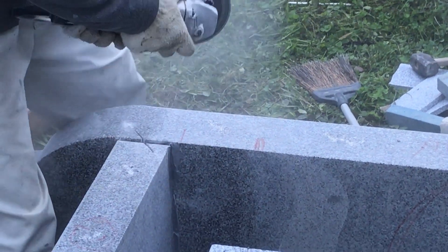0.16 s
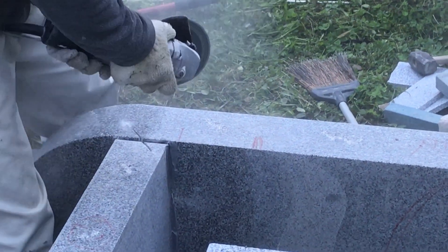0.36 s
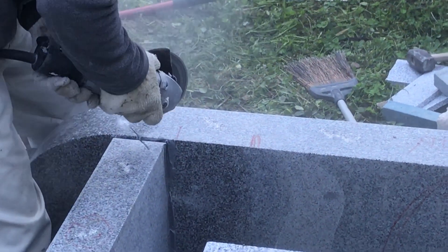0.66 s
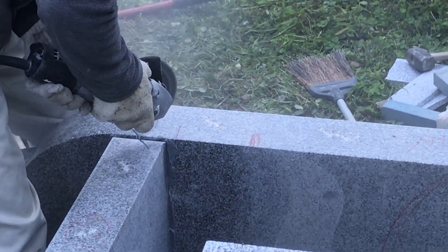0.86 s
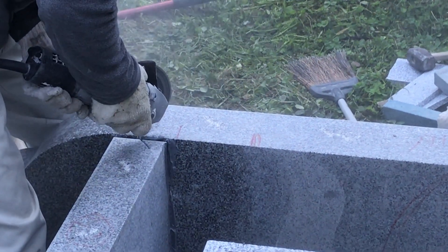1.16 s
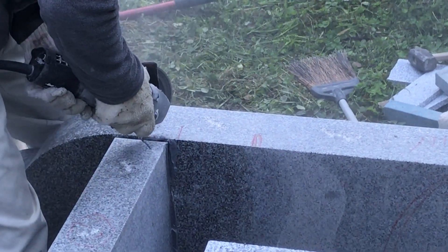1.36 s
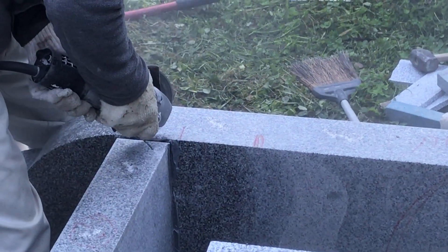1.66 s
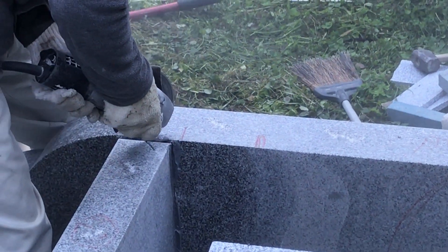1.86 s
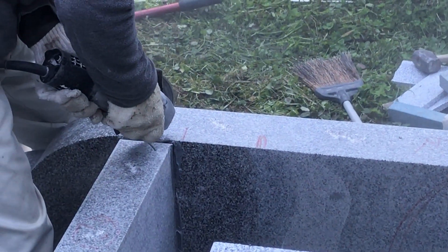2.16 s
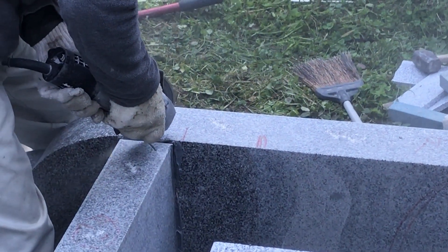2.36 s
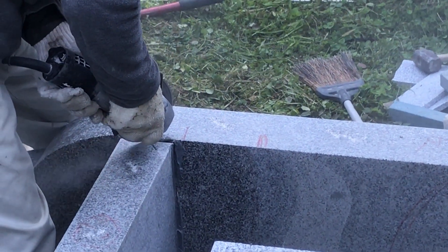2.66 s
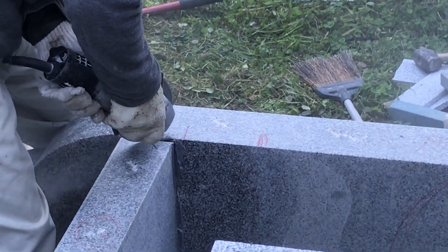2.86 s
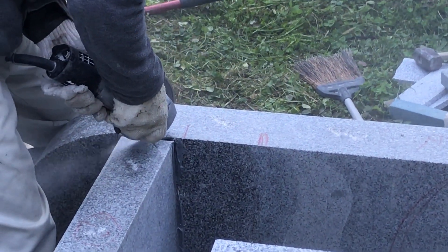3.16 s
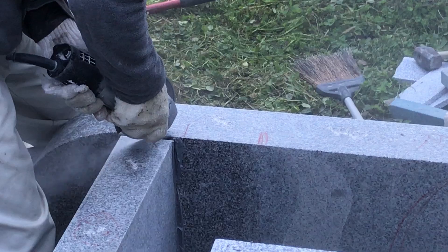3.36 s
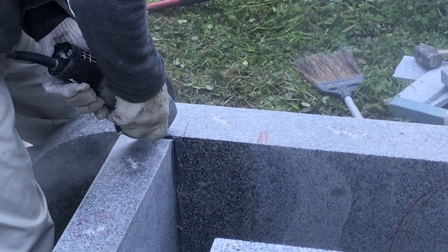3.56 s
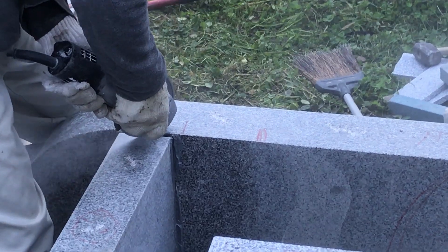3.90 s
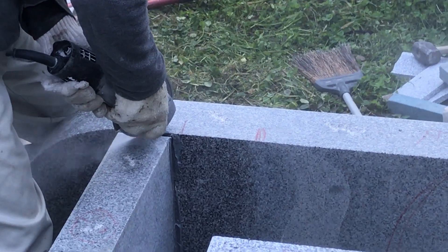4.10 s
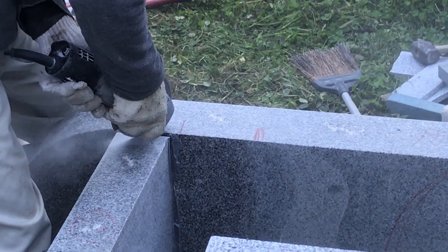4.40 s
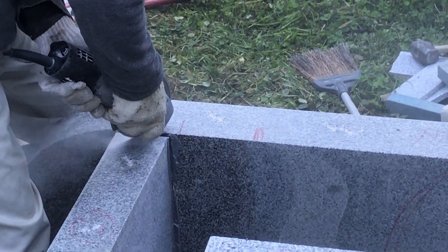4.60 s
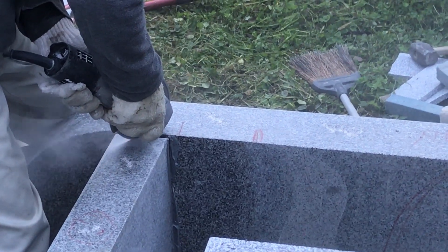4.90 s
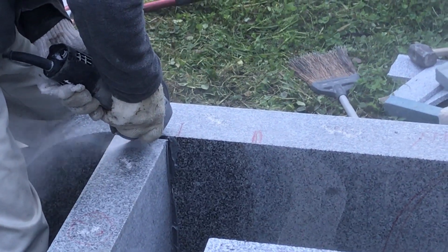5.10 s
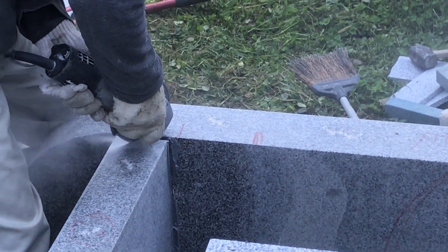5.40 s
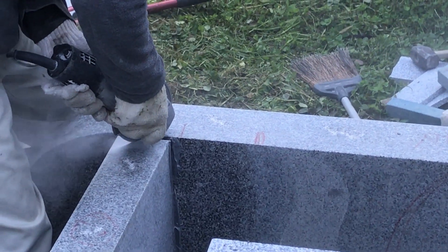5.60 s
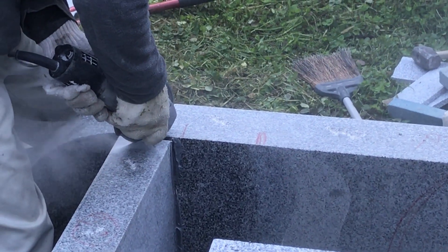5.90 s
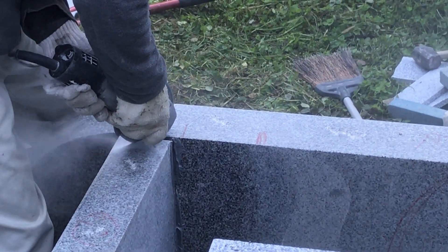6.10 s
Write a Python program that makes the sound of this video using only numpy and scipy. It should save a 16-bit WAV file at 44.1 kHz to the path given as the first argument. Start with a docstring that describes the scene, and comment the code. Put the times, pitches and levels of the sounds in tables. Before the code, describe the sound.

An angle grinder spins up with rushing air and rising whine, then bites into granite with a harsh, squealing, knocking grind outdoors.

```python
"""An angle grinder spins up in the open air: air rushes, tones climb and loose gears rattle in short spells.
Then its diamond wheel is pushed into a granite kerb: noise shaped by resonances grinds and knocks in the cut.
The motor slows under the load, and its fan, hum and whine follow; steady tones sing out as wheel squeals.
Further off, a generator drones as a stack of steady tones over low outdoor noise.
The recorder's gain control turns the loud cut down, so the fan and generator sink with it."""
import sys
import numpy as np
from scipy import signal
from scipy.fft import rfft, irfft, next_fast_len
from scipy.io import wavfile
from scipy.ndimage import uniform_filter1d

SR = 44100
rng = np.random.default_rng(int(sys.argv[2]) if len(sys.argv) > 2 else 0)


def transcribe(u):
    """Save the signal u as a 16-bit wav file named by the first command-line argument.

    u: samples, shape (n,) or (channels, n), limited to [-1, 1]; the rate is SR.
    q: integer samples, one column per channel.
    """
    v = np.clip(np.atleast_2d(u).T, -1, 1)
    q = np.round(v * 32767).astype(np.int16)
    wavfile.write(sys.argv[1], SR, q)


N = 275625
TIME = np.arange(N) / SR  # seconds

# All levels below are those before the stone echoes and the gain control.

# Colour of the rushing cooling air: pitch_hz, level_db (relative, per Hz)
FAN_COLOUR = [(200, -31), (385, -8), (590, -13), (740, -5), (1120, -4.5), (1900, -8), (2600, -4),
              (4200, -4.5), (4950, -7), (5500, -2), (7200, -6), (7800, -9.5), (9600, -7.5), (10400, -13),
              (11400, -8.5), (13500, -11), (15500, -15.5)]
# Air passages of the housing: pitch_hz, width_hz, level_db (over the rush)
HOUSING_MODES = [(2293, 135, 1.5), (2840, 170, 3.5), (3540, 360, 1.5), (6100, 250, 3.5), (8060, 300, 0)]
# Vents turning as the tool is lowered: time_s, hiss_hz, hiss_db (against the rush), low_rush_db
VENT_CURVES = [(0, 4720, -9, -4), (.1, 4710, -3.5, -2.5), (.25, 5450, -8, -1), (.56, 5600, -11.5, 1.5),
               (.68, 3800, -4.5, 0.5), (1, 3550, -24, 2), (1.35, 6200, -12, 2.5), (6.25, 6200, -20, -1)]
# Fan and armature tones: multiple of the shaft speed, level_db (against the rush)
WHINE_TONES = [(2, -24), (3, -26), (4, -24), (5, -37), (9, -25), (10, -30), (12, -14), (24, -12)]
# Spells in which the unloaded gears rattle: start_s, end_s, peak_db
RATTLE_SPELLS = [(0.362, 0.58, -22.5), (0.911, 1.025, -22.5), (1.3, 1.718, -21)]
# Braking of the wheel by the stone: time_s, share of the speed lost (0-1)
DRAG_CURVE = [(2.1, 0), (2.3, .006), (2.6, .03), (3.2, .112), (3.8, .212), (4.4, .28), (5, .324),
              (6.25, .368)]

# Sinking of the wheel into the stone: time_s, depth (0-1)
DEPTH_CURVE = [(2.1, 0), (2.9, 0.26), (3.3, 0.45), (3.7, 0.71), (4.3, 0.94), (6.25, 0.95)]
# Pressure on the wheel: time_s, grind_db, bounce_db, low_ring_db (change of the low stone ring)
PRESSURE_CURVES = [(2.11, -25.5, -29.5, -15), (2.44, -26, -14.5, 2), (2.56, -17.5, -13, 5.5),
                   (2.85, -17, -11, 3), (3.15, -15, -7.5, 1.5), (3.38, -16, -8, -1), (3.58, -11, -9.5, 0),
                   (4.6, -11.5, -7, -2.5), (6.25, -10, -7, -6)]
# Hard knocks of the wheel in the cut: time_s, level_db (over an ordinary hop)
HARD_KNOCKS = [(2.197, 5.5), (2.334, 1), (2.441, 1.5), (2.631, 0), (2.737, 3), (2.772, 4), (2.847, 2),
               (2.967, 1), (3.073, 2), (3.133, 3.5), (3.26, 0), (3.314, 1.5), (3.343, 2), (3.396, 0),
               (3.426, 3), (3.618, -1), (3.766, 3.5), (3.927, 4.5), (4.186, 4.5), (4.495, 2), (4.616, 3),
               (4.827, 2), (5.254, 2.5), (5.621, 1.5), (5.83, 1.5), (6.11, 3)]
# Ringing of wheel, guard and stone: pitch_hz, width_hz, shallow_db, deep_db (over the broad noise)
CUT_MODES = [(1108, 39, 13, 2), (1327, 91, 8.5, 6), (1663, 54, -4, 2), (2390, 390, 0, 4.5),
             (2900, 58, -8, 10.5), (3180, 57, 15, 11.5), (3590, 32, 10, 13.5), (3877, 216, 14, 10.5),
             (3987, 123, 16, 16), (4254, 63, 24.5, 15.5), (4535, 91, 17.5, 15), (4700, 34, 20.5, 12),
             (5360, 50, 14.5, 13), (5852, 115, 19.5, 17), (5980, 132, 17, 16), (7300, 160, 8.5, 10.5),
             (8084, 62, 11.5, 12), (8345, 47, 18, 15), (8650, 17, 11, -4), (8765, 28, -10, 19.5),
             (9340, 62, 10, 11), (9880, 117, 9, 1), (10150, 100, -4, 1.5), (10080, 22, 16.5, -1),
             (10900, 180, 5.5, 4), (11740, 190, -3, 8.5), (12030, 134, 18, 11), (13270, 115, 0.4, 13.5),
             (13684, 60, 7, -6.0), (13900, 160, 15, 8)]
# Colour of crushed grains: pitch_hz, level_db (relative, per Hz)
GRIT_COLOUR = [(200, -24), (500, -22), (700, -15), (1200, -4), (2000, -4.5), (3000, -3), (4300, -1),
               (5100, -3.5), (7000, -2), (9000, 0), (12500, 0), (14300, -4.5), (15600, -0.5)]
# Extra colour of the steady grinding: pitch_hz, level_db
GRIND_COLOUR = [(700, 4.5), (1500, -1), (4000, 0), (6000, -3), (8000, 3.5), (15000, 2.5)]
# Extra colour of the knocks: pitch_hz, level_db
KNOCK_COLOUR = [(700, -13), (1500, 6), (4000, 2), (6000, 2), (8000, -2), (15000, -1.5)]
# Wheel tones that friction sets singing: start_s, end_s, pitch_hz, level_db
SQUEAL_TONES = [(2.1, 2.7, 8549, -26), (2.1, 2.6, 14200, -36), (2.1, 2.55, 14800, -40),
                (2.1, 2.35, 13200, -38), (2.12, 2.7, 3876, -32), (2.45, 3.6, 13690, -33),
                (2.5, 3.4, 8136, -30), (2.9, 3.7, 3209, -31), (3.3, 3.85, 10056, -27),
                (3.3, 5.0, 8294, -28), (3.5, 5.0, 8723, -25), (4.05, 4.55, 8700, -18),
                (4.4, 5.4, 9190, -28), (4.6, 6.25, 13410, -28)]

# Generator engine speed: time_s, firings_per_s
FIRING_CURVE = [(0, 31.0), (.8, 30.9), (1.2, 31.45), (2.0, 31.55), (6.25, 31.1)]
# Generator exhaust tones: multiple of the firing rate, level_db (over the drone level)
EXHAUST_TONES = [(2, -3), (3, -16.5), (4, -17), (5, -8.5), (6, -4), (7, -18.5), (8, -13.5), (9, -18.5)]
# Colour of the outdoor noise: pitch_hz, level_db (relative, per Hz)
YARD_COLOUR = [(25, -30), (60, -9), (120, -1), (250, 2.5), (500, -6), (1000, -24), (4000, -20)]
# Reflections off the kerb stones and the ground: delay_s, gain
STONE_ECHOES = [(.00339, .2), (.0022, .1), (.00381, .09), (.00868, .12), (.0134, .12), (.0197, .1),
                (.0283, .09)]

# The motor nears its free speed (turns per s) with this time constant (s); shaft turns per wheel turn
START_SPEED, FREE_SPEED, SPIN_UP_S = 456, 602.5, 1.0
GEAR_RATIO = 3.56
# Air and hum: level at free speed, and the power of the speed with which each grows
RUSH_DB, RUSH_POWER = -25, 0.83
HUM_DB, HUM_POWER = -42, 4.8
RATTLES_PER_S, RATTLE_SPREAD_DB = 27, 0.5
# The wheel meets the stone
TOUCH_S, TOUCH_RISE_S = 2.1, 0.018
# Hop rate in a shallow and a deep cut, and the power of depth between them
SHALLOW_HOPS_PER_S, DEEP_HOPS_PER_S, GRIP_POWER = 35.5, 56, 3.0
HOP_JITTER_S, HOP_SPREAD_DB = 0.0023, 1.57
LIFT_OFF = 0.04  # how strongly grinding thins out between hops (0-1)
DRONE_DB, YARD_DB = -36.5, -45.5
# Recorder: level its gain control holds, how fast the gain falls and creeps back (dB per s), and the end of its
# treble
HOLD_DB, TURN_DOWN_DB_PER_S, RECOVER_DB_PER_S = -17, 6.5, 6
CUTOFF_HZ = 15750


def shaft_speed():
    """The motor runs up freely, then slows under the load: turns per s."""
    unloaded = FREE_SPEED - (FREE_SPEED - START_SPEED) * np.exp(-TIME / SPIN_UP_S)
    return unloaded * (1 - in_time(DRAG_CURVE)[0])


def motor(speed):
    """Cooling air, shaft hum and whine grow with the speed; unloaded gears rattle in spells."""
    speed_db = 20 * np.log10(speed / FREE_SPEED)
    fan_db = RUSH_DB + RUSH_POWER * speed_db
    shaft = turns_of(speed * (1 + 0.00054 * drift(26)))
    # the air pulses with each turn of the shaft and of the wheel
    pulse_db = 1.1 * np.sin(shaft) + 0.79 * np.sin(shaft / GEAR_RATIO)
    flow = from_db(fan_db + 0.86 * drift(60) + pulse_db)
    hum_db = HUM_DB + HUM_POWER * speed_db + 0.36 * drift(5)
    hum = from_db(hum_db) * np.sqrt(2) * np.sin(shaft)
    whine = np.zeros(N)
    for multiple, db in WHINE_TONES:
        whine += from_db(fan_db + db + 3.4 * drift(25)) * np.sin(multiple * shaft)
    return air(flow) + hum + whine + gear_rattle()


def gear_rattle():
    """Loose gear teeth clack together: short noise bursts ring in two broad resonances."""
    clacks = []
    for start, end, db in RATTLE_SPELLS:
        for s in evenly(start, end, RATTLES_PER_S):
            clacks.append((s, db + RATTLE_SPREAD_DB * rng.standard_normal()))
    backlash = blows(clacks, rise_s=0.00072, decay_s=0.0029)
    gears = resonate(backlash * rng.standard_normal(N), 6240, 900)
    gears = resonate(gears, 5800, 1300)
    return gears * rms(backlash) / rms(gears)


def air(flow, hiss_width_hz=750):
    """Air rushes through the housing, with a hiss whose pitch shifts as the vents turn."""
    hiss_hz, hiss_db, low_db = in_time(VENT_CURVES)
    modes = [(hz, width_hz, from_db(db)) for hz, width_hz, db in HOUSING_MODES]
    rush = rubbed(flow, modes, FAN_COLOUR)
    low_change = (from_db(low_db) - 1) * band(rush, 590, 1600)
    # two slow noises, moved up to the hiss pitch
    lowpass = signal.butter(2, hiss_width_hz, fs=SR, output="sos")
    eddies = signal.sosfilt(lowpass, rng.standard_normal((2, N)))
    angle = turns_of(hiss_hz)
    hiss = eddies[0] * np.cos(angle) + eddies[1] * np.sin(angle)
    return rush + low_change + flow * from_db(hiss_db) * hiss / rms(hiss)


def cut(speed):
    """Diamond grit crushes the stone, harder once a turn of the wheel and at every bounce."""
    depth = in_time(DEPTH_CURVE)[0]
    grind_db, bounce_db, low_ring_db = in_time(PRESSURE_CURVES)
    # the walls of the cut damp some modes and drive others
    modes = []
    for hz, width_hz, shallow_db, deep_db in CUT_MODES:
        gain = from_db(shallow_db) * (1 - depth) + from_db(deep_db) * depth
        modes.append((hz, width_hz, gain))
    wheel = turns_of(speed / GEAR_RATIO)
    grains = from_db(1.68 * drift(710))
    hopping = blows(bounces(depth, bounce_db), rise_s=0.0015, decay_s=0.0049)

    # between bounces the wheel lifts a little, so the grinding thins out
    bounce = hopping + .02
    pressed = (bounce / uniform_filter1d(bounce, SR // 10)) ** LIFT_OFF
    touching = np.clip((TIME - TOUCH_S) / TOUCH_RISE_S, 0, 1)
    push = from_db(grind_db + 2 * np.sin(wheel) + 1.1 * drift(27))
    grinding = rubbed(touching * push * grains * pressed, modes, GRIT_COLOUR, GRIND_COLOUR)

    knock_force = hopping * grains * from_db(0.7 * np.sin(wheel))
    knocks = rubbed(knock_force, modes, GRIT_COLOUR, KNOCK_COLOUR)
    low_ring_change = (from_db(low_ring_db) - 1) * band(knocks, 1240, 1650)
    return grinding + knocks + low_ring_change


def bounces(depth, bounce_db):
    """Each hard knock sets the wheel hopping until the next, faster in a deep cut: rows of time_s, level_db."""
    per_s = SHALLOW_HOPS_PER_S + (DEEP_HOPS_PER_S - SHALLOW_HOPS_PER_S) * depth ** GRIP_POWER
    starts = [s for s, _ in HARD_KNOCKS]
    ends = starts[1:] + [TIME[-1]]
    hops = []
    for start, end in zip(starts, ends):
        rate = np.interp((start + end) / 2, TIME, per_s)
        hops.append(evenly(start, end, rate)[1:-1])  # the ends are the knocks themselves
    hops = np.concatenate(hops)
    hop_s = hops + HOP_JITTER_S * rng.standard_normal(len(hops))
    hop_db = HOP_SPREAD_DB * rng.standard_normal(len(hops))
    s, db = np.vstack([HARD_KNOCKS, np.column_stack([hop_s, hop_db])]).T
    return np.column_stack([s, db + np.interp(s, TIME, bounce_db)])


def squeals(fade_in_s=0.093, fade_out_s=0.072, waver_hz=11):
    """Friction makes wheel modes sing in turn or together, each fluttering in level and pitch."""
    out = np.zeros(N)
    for start, end, hz, db in SQUEAL_TONES:
        fade_in = (TIME - start) / fade_in_s
        fade_out = (end - TIME) / fade_out_s
        swell = np.clip(np.minimum(fade_in, fade_out), 0, 1)
        tone = np.sin(turns_of(hz + waver_hz * drift(89)))
        out += swell * from_db(db + 4.9 * drift(23)) * tone
    return out


def thrum(speed):
    """Deep in the cut the wheel pushes on the stone once a turn: a low, unsteady note."""
    depth = in_time(DEPTH_CURVE)[0]
    wheel = turns_of(speed / GEAR_RATIO) + 0.88 * drift(15)
    return depth * from_db(-45.0 + 2 * drift(8)) * np.sin(wheel)


def generator():
    """Regular engine firings make a drone: exhaust tones at multiples of the firing rate."""
    cycle = turns_of(in_time(FIRING_CURVE)[0])
    drone = np.zeros(N)
    for multiple, db in EXHAUST_TONES:
        phase = rng.uniform(0, 2 * np.pi)
        drone += from_db(db + 0.66 * drift(3.6)) * np.sin(multiple * cycle + phase)
    return from_db(DRONE_DB) * np.sqrt(2) * drone


def yard():
    """Low outdoor noise: random noise with a dark colour."""
    bed = coloured(rng.standard_normal(N), YARD_COLOUR)
    return from_db(YARD_DB) * bed / rms(bed)


def among_stones(x):
    """Hard faces close by send back quick copies, which ripple the colour."""
    out = x.copy()
    for delay_s, gain in STONE_ECHOES:
        out += gain * np.interp(TIME - delay_s, TIME, x, left=0)
    return out


def gain_control(x):
    """While the sound is too loud the gain slides down; otherwise it creeps back up, at most to 0 dB."""
    step = SR // 100
    power = np.abs(uniform_filter1d(x[0] ** 2, SR // 10))[::step]
    level_db = 10 * np.log10(power + 1e-12)
    gain_db = [0.]
    for db in level_db[1:]:
        wanted = min(HOLD_DB - db, 0)
        lowest = gain_db[-1] - TURN_DOWN_DB_PER_S * step / SR
        highest = gain_db[-1] + RECOVER_DB_PER_S * step / SR
        gain_db.append(np.clip(wanted, lowest, highest))
    return x * from_db(np.interp(TIME, TIME[::step], gain_db))


def rubbed(force, modes, *colours):
    """A fluctuating force drives broad noise and every mode; the result is as strong as the force."""
    out = force * rng.standard_normal(N)
    for hz, width_hz, gain in modes:
        out = out + resonate(gain * force * rng.standard_normal(N), hz, width_hz)
    for colour in colours:
        out = coloured(out, colour)
    return out * rms(force) / rms(out)


def blows(events, rise_s, decay_s):
    """Force of short contacts: each swells smoothly and dies away."""
    s, db = np.transpose(events)
    places = np.clip(s * SR, 0, N - 1).astype(int)
    clicks = np.bincount(places, from_db(db), N)
    t = TIME[:SR // 10]
    shape = (1 - np.exp(-t / rise_s)) ** 2 * np.exp(-t / decay_s)
    return signal.fftconvolve(clicks, shape / shape.max())[:N]


def resonate(x, hz, width_hz):
    """One resonance with a gain of about 1 at its peak."""
    r = np.exp(-np.pi * width_hz / SR)
    top = np.array([1, 0, -1]) * (1 - r * r) / 2
    bottom = [1, -2 * r * np.cos(2 * np.pi * hz / SR), r * r]
    return signal.lfilter(top, bottom, x)


def band(x, low_hz, high_hz):
    """A gentle filter that keeps the sound between two pitches."""
    return signal.sosfilt(signal.butter(1, [low_hz, high_hz], "band", fs=SR, output="sos"), x)


def coloured(x, spectrum):
    """A broad, smooth colour laid on a sound."""
    hz, db = np.transpose(spectrum)
    size = next_fast_len(N + SR // 10)
    bins = np.maximum(np.fft.rfftfreq(size, 1 / SR), 1)
    gain = from_db(np.interp(np.log(bins), np.log(hz), db))
    return irfft(rfft(x, size) * gain, size)[:N]


def drift(rate_hz):
    """Smooth random wandering with a spread of 1, made at every 20th sample and joined up."""
    r = np.exp(-40 * np.pi * rate_hz / SR)
    noise = rng.standard_normal(N // 20 + 4002)
    slow = signal.lfilter([1], [1, -2 * r, r * r], noise)[4000:]  # drop the filter's start-up
    return np.interp(np.arange(N) / 20, np.arange(len(slow)), slow / rms(slow))


def turns_of(per_s):
    """Angle in radians of something that turns at this rate."""
    return 2 * np.pi * np.cumsum(per_s) / SR


def evenly(start, end, per_s):
    """Evenly spaced moments from start to end, at about this rate."""
    return np.linspace(start, end, max(round((end - start) * per_s), 1) + 1)


def in_time(rows):
    """Each column of a curve, at every sample."""
    s, *columns = np.transpose(rows)
    return [np.interp(TIME, s, column) for column in columns]


def from_db(db):
    """Decibels to gain."""
    return 10 ** (np.asarray(db) / 20)


def rms(x):
    """Average strength of a sound (root mean square)."""
    return np.sqrt(np.mean(x ** 2) + 1e-20)


def scene():
    """Grinder and cut among the stones, with squeals, thrum, generator and outdoor noise."""
    speed = shaft_speed()
    grinder = among_stones(motor(speed) + cut(speed))
    mix = grinder + squeals() + thrum(speed) + generator() + yard()
    return mix[None]  # one channel


def record(dry):
    """Gain control rides the level, the highest peaks are rounded and the top is cut."""
    held = gain_control(dry)
    rounded = held / (1 + (held / .66) ** 4) ** .25
    lowpass = signal.ellip(12, .1, 90, CUTOFF_HZ, fs=SR, output="sos")
    return signal.sosfilt(lowpass, rounded)


dry = scene()
out = record(dry)
transcribe(out)
```